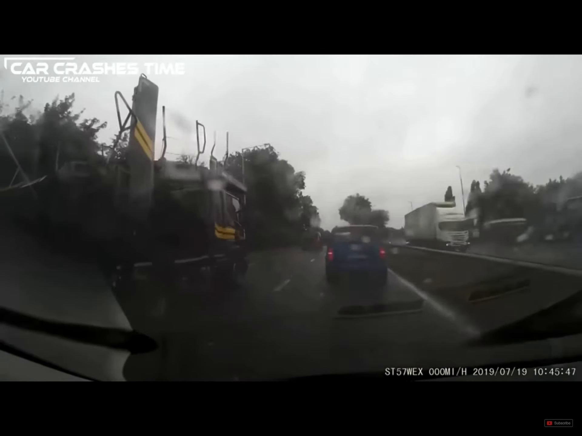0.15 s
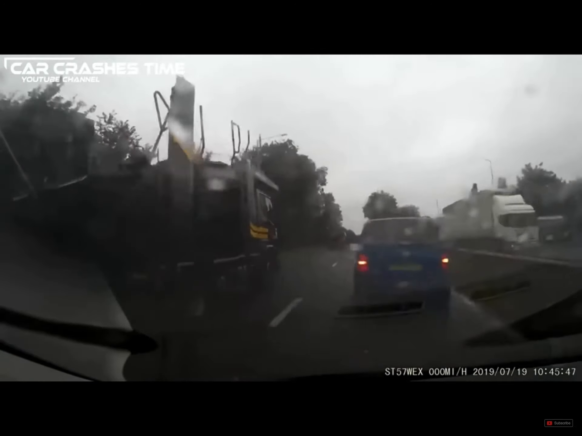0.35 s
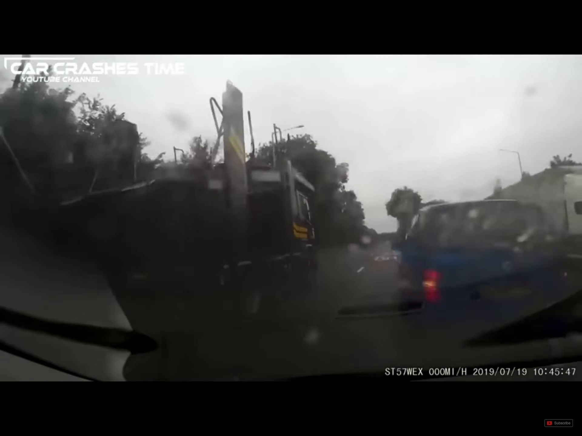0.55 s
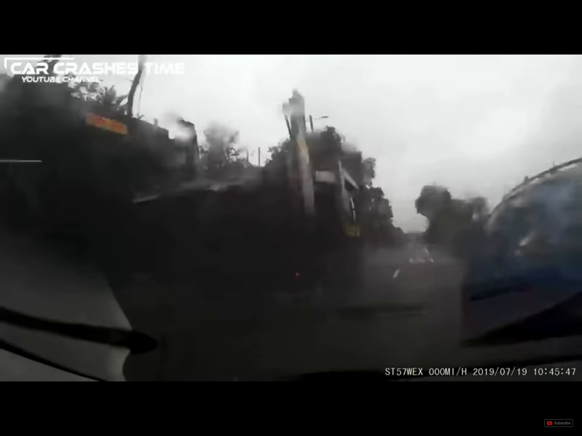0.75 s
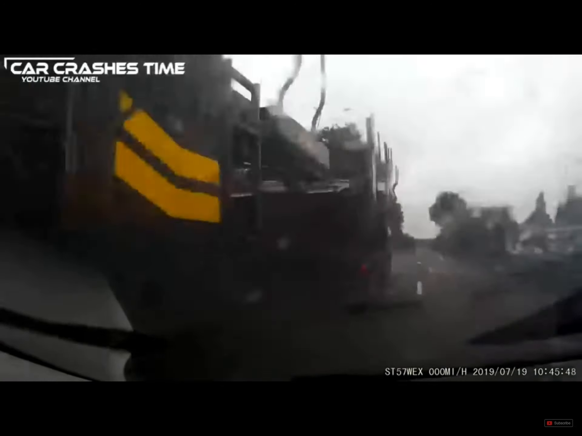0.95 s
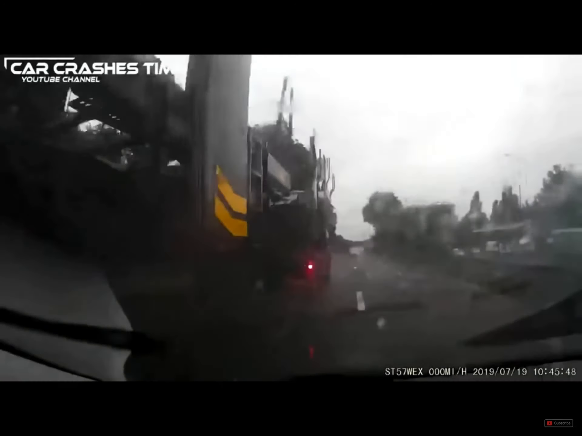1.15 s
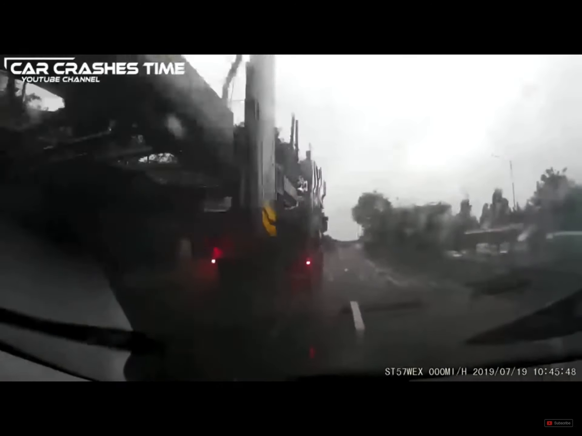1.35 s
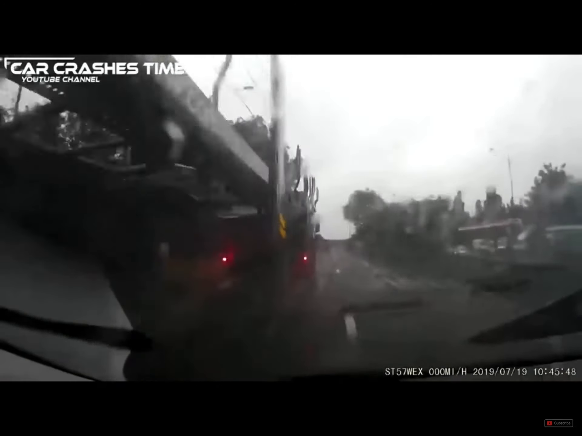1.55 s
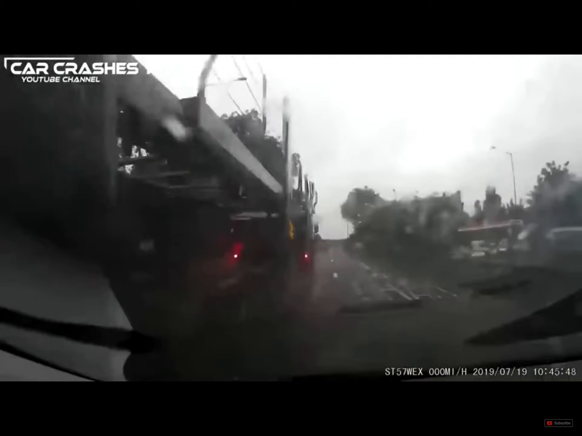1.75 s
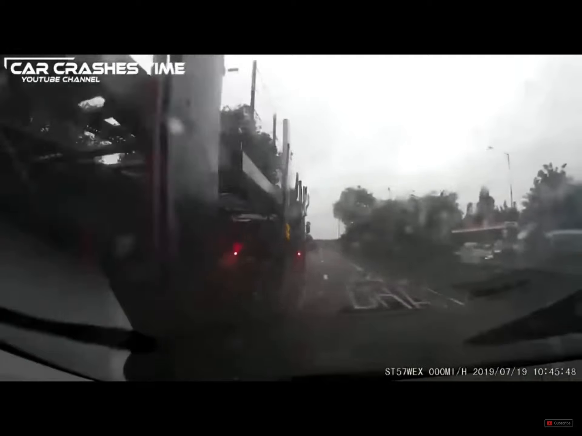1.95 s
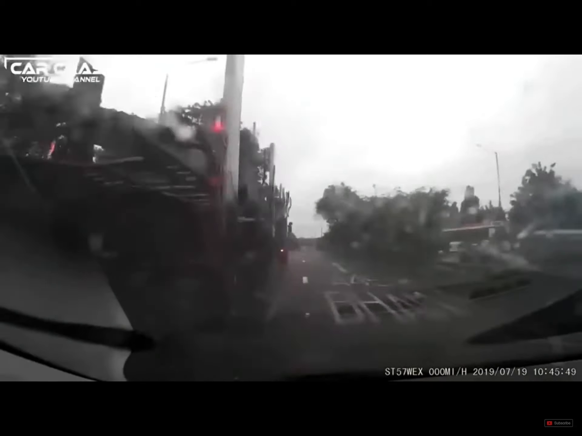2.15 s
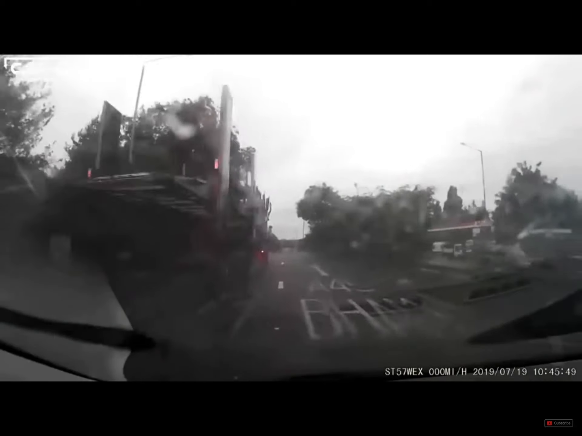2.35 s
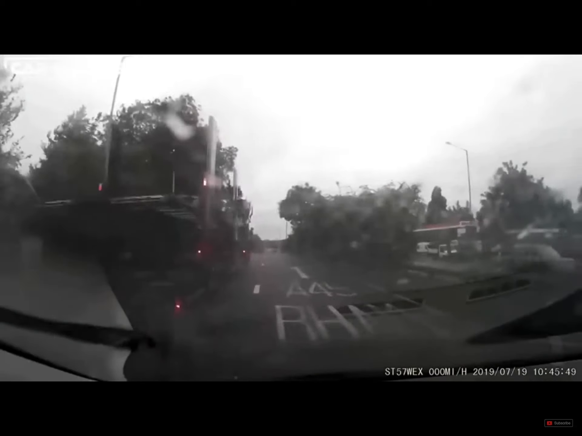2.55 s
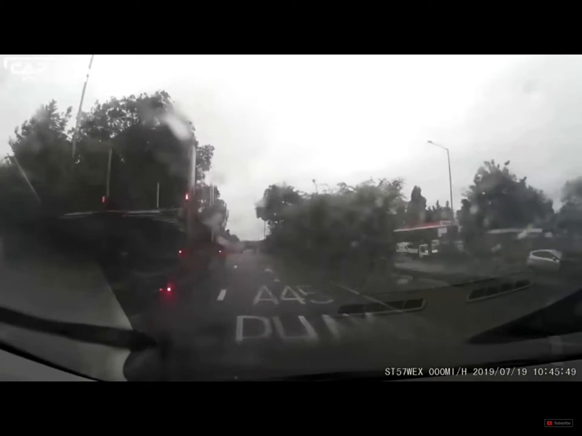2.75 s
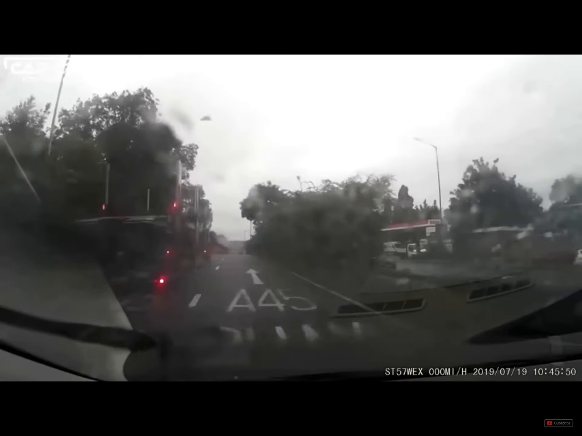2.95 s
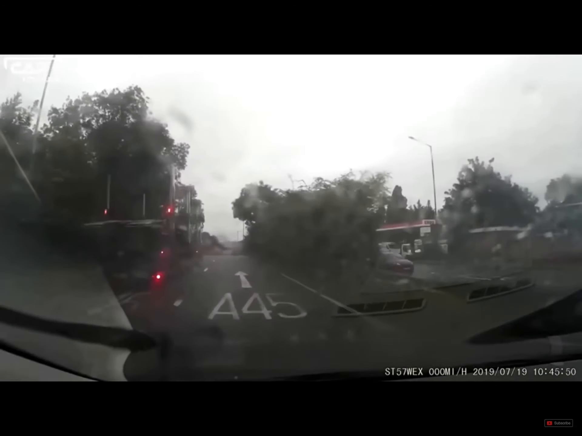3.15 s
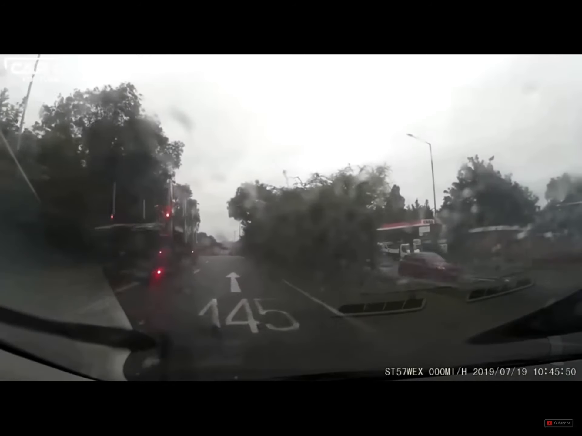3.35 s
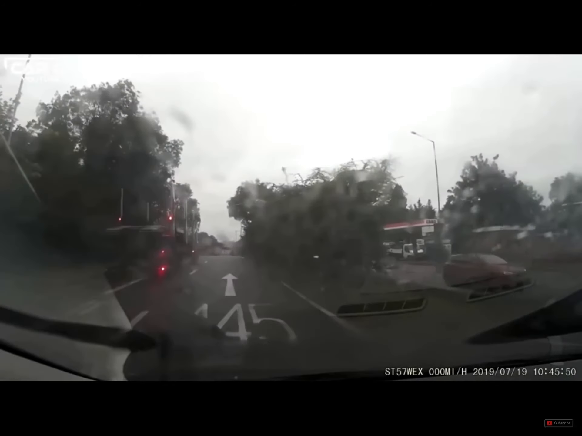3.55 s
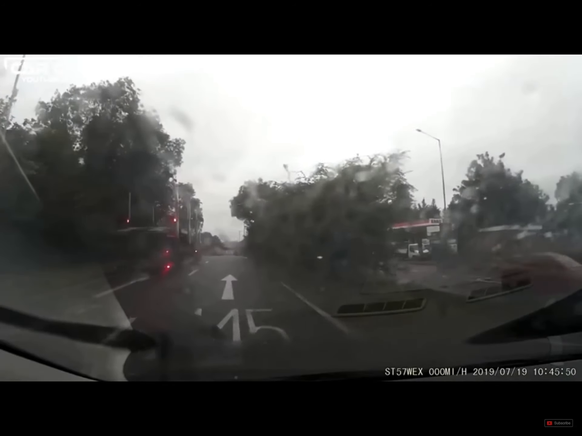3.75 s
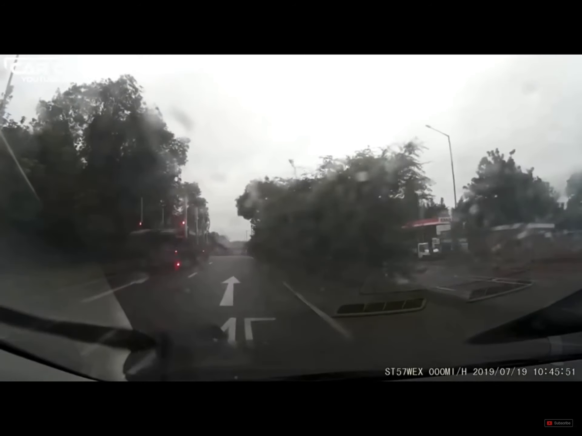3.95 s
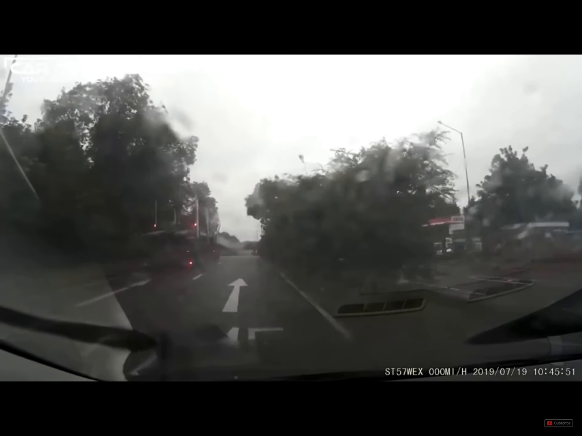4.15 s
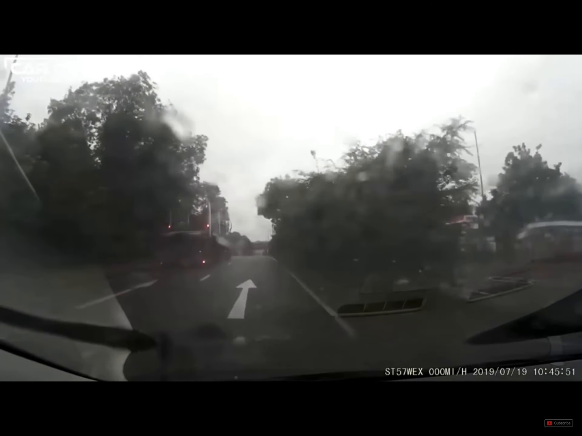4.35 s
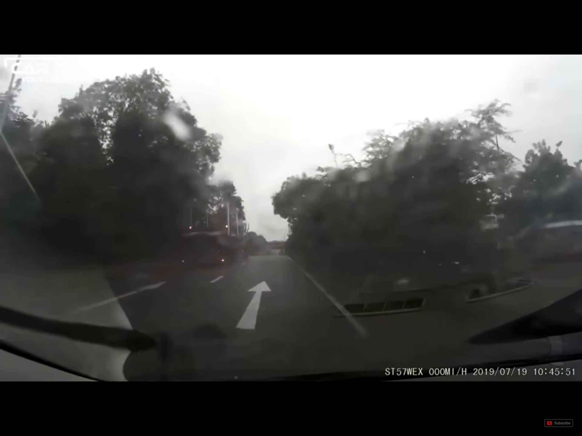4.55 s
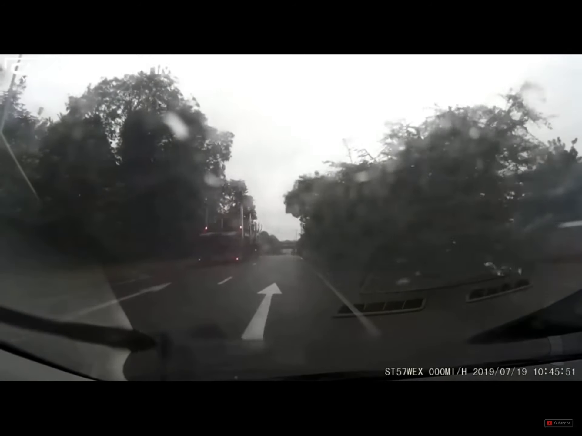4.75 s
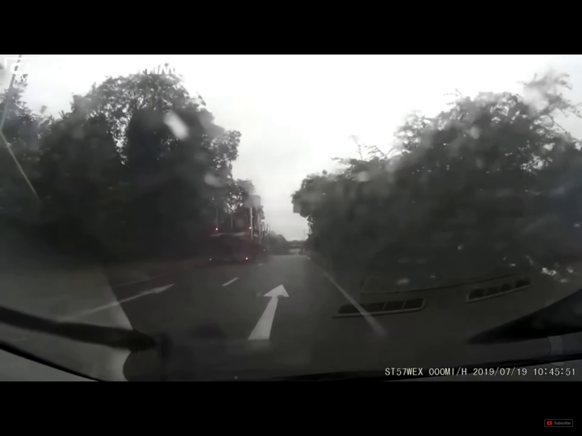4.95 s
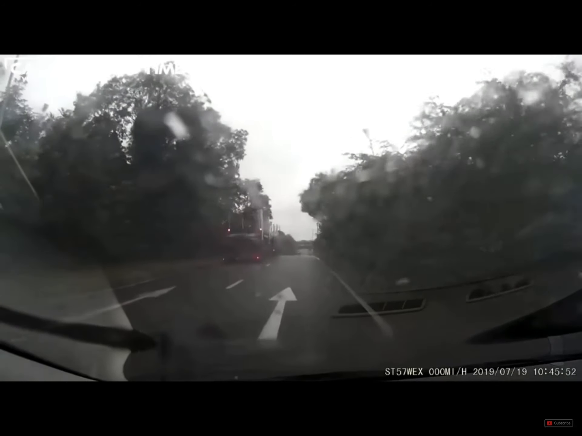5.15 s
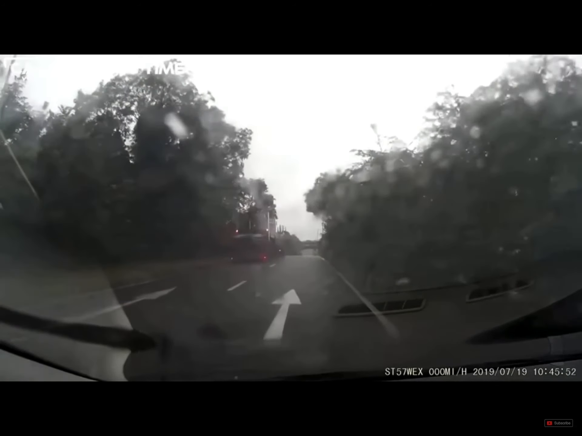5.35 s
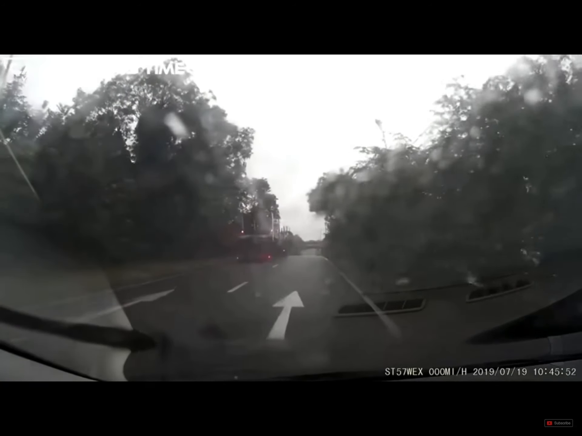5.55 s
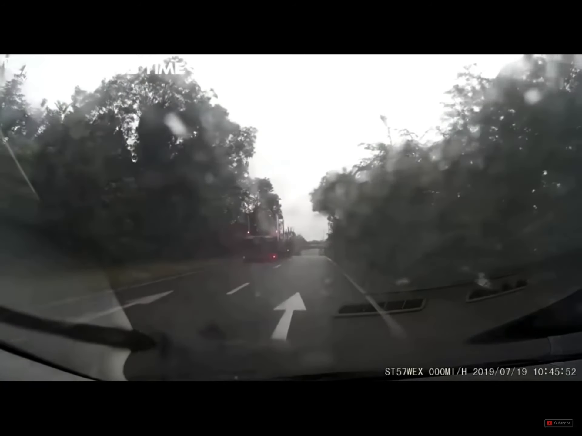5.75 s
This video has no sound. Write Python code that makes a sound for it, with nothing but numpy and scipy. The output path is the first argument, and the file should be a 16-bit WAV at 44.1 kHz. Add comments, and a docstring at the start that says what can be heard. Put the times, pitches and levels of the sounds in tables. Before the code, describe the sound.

Inside a closed car on a rainy road, sharp knocks and a high chirping rattle come first. Heavy, distorted thuds, booms, grinding and cracking trim burst out as the car is struck and scraped. After about two seconds the blows thin into smaller clatter with brief metallic notes, then faint rumble and wet hiss as it slows. A small windscreen microphone overloads.

```python
"""Inside a car braking hard on a wet road, a hard thud and a door boom open the scene; a loose part chirps and
knocks sound; heavier thuds and booms follow from 0.7 s. The car is struck and scraped along its side, jolts on
and rolls to a crawl. Noise drives the resonances of springs, shell, door and panels; coloured clicks grind,
rasp and crack; short tones ring out of the clatter; taps excite the loose part; filtered clicks make the tyres
hiss in the water. The small microphone on the windscreen overloads on the hardest blows."""
import sys
import numpy as np
from scipy import signal
from scipy.fft import rfft, irfft
from scipy.io import wavfile

SR = 44100
rng = np.random.default_rng(int(sys.argv[2]) if len(sys.argv) > 2 else 0)


def output_pcm(signal):
    """Save a mono or channel-first signal as 16-bit PCM at the path in sys.argv[1].

    Samples are clipped to [-1, 1] before scaling.
    """
    pcm = np.clip(np.atleast_2d(signal).T, -1, 1) * 32767
    wavfile.write(sys.argv[1], SR, np.round(pcm).astype(np.int16))


N = 259749   # length in samples

# All levels are relative mixing levels.
# Shaking of the car: start_s, suspension_db, boom_db, grind_db, rasp_db (above the grinding)
SHAKING_CURVES = [(0.0, -9, -15.5, -30.5, -2), (0.15, -14, -17, -35, -8.5), (0.35, -16.5, -13, -28.5, -9),
                  (0.63, -19.5, -13, -24.5, -16), (0.69, -32, -7.5, -19.5, -12.5), (0.78, -1, 3.5, -3, -12),
                  (0.92, -9.5, -16, -27, -31), (1.02, -6, 0.5, -5, -8), (1.12, -1, -10, -25, -13.5),
                  (1.18, 4, -6, -21.5, -1), (1.23, -9, -13, -22.5, -12), (1.33, -5.5, -16.5, -17, -19),
                  (1.48, -11, 5.5, -1.5, -14), (1.7, -5, -20, -21.5, -14.5), (1.79, -11.5, -17, -19, -16.5),
                  (1.87, -9, -9.5, -16.5, -17.5), (2.1, -12, -19.5, -30, -18),
                  (2.45, -19.5, -21, -21.5, -18.5), (2.66, -20.5, -27.5, -29, -15), (2.9, -19, -30, -33, 0),
                  (3.1, -18.5, -25.5, -32, -11), (3.5, -32.5, -32.5, -39.5, -5),
                  (3.9, -35, -34.5, -50, 2.5), (4.3, -29, -33, -46, -4.5), (4.7, -37.5, -39, -45.5, -5),
                  (5.2, -32.5, -35, -38, -9.5), (5.6, -37, -40, -43.5, -9.5), (5.89, -35.5, -43, -41.5, -5)]
# Blows on the car: start_s, door_db, crack_db and thump_db (above the door), contact_s
BLOW_EVENTS = [(0.036, 0.5, -5, 0.5, 0.0083), (0.063, -5.5, -1, -15, 0.0065),
               (0.151, -16.5, -11.5, -8, 0.0068), (0.239, -3.5, -11.5, -4, .01),
               (0.315, -32.5, 11, 3, .015), (0.334, -27.5, 8.5, -8, 0.025), (0.353, -19.5, 0, -7, 0.019),
               (0.488, -25, 5.5, -4, 0.017), (0.514, -24, -19, 17.5, 0.0058),
               (0.708, 2, -12.5, 12.5, 0.013), (0.733, 3.5, -12, -6, 0.028), (0.79, -8, -3.5, 5, 0.033),
               (0.832, -10, -3.5, 0, 0.024), (0.87, 8.5, -6.5, -19, 0.0078), (0.977, 1, -12.5, 7.5, 0.034),
               (1.009, -4.5, 2, 11, 0.0043), (1.036, -9.5, 0, 10.5, 0.015), (1.079, -17, -0.5, -1, 0.025),
               (1.163, 4, -17.5, 6, 0.0021), (1.178, -10.5, 0, -13, 0.011), (1.246, -19, -1, 18, 0.01),
               (1.334, -8, -22, -13, 0.03), (1.365, 0, -22, 2, 0.027), (1.399, -14.5, 2, 20.5, 0.031),
               (1.442, 0, -8.5, -16, .024), (1.469, 15.5, -17, -11, 0.041), (1.52, 4.5, -12, 3.5, 0.031),
               (1.617, -0.5, -18, -8, .006), (1.676, -17, -2, 13.5, 0.0061), (1.749, -27, -11, 17, 0.019),
               (1.842, -7.5, -9.5, 4.5, 0.037), (1.867, -17, 0.5, -5, 0.027),
               (1.892, -3.5, -20, -10, 0.014), (1.948, -21, -12, -3, .008), (2.039, -29, -20, -5, .01),
               (2.349, -15.5, -13, 3, .005), (2.399, -8, -26, -4, 0.017), (2.427, -13, -12.5, 7, 0.0074),
               (2.487, -14, -40, -19, 0.02), (2.535, -11, -35, -20, .024), (2.57, -5, -20, -14, 0.0029),
               (2.685, -14.5, -12, -16, 0.0054), (2.763, -12.5, -25, -3, 0.035),
               (2.796, -8, -16, -22, 0.017), (2.827, -15, -13.5, 4.5, 0.028),
               (2.863, -14.5, -12, -13, 0.026), (2.949, -20.5, -7, -6, 0.013), (2.999, -22, -8, -15, 0.03),
               (3.053, -19, -36, 12.5, 0.0082), (3.095, -17.5, -5, 0, .022), (3.123, -15.5, -16, -1, 0.016),
               (3.176, -27.5, 2, 7, 0.0066), (3.256, -10.5, -41, -13, 0.016), (3.297, -14.5, -24, -3, .008),
               (3.367, -23.5, -2, -9, 0.005), (3.449, -39.5, 10, 1, .01), (4.182, -9.5, -26, -4, .015),
               (4.774, -47, 10, 3, .006), (4.949, -13, -28, 2.5, 0.0095), (4.973, -13.5, -32, -3, 0.012),
               (4.986, -8.5, -39, -8, 0.0033)]
# Lurches of the car on its springs: peak_s, level_db
LURCH_EVENTS = [(0.07, -23), (0.46, -10), (0.884, 23.5), (1.06, 13), (1.129, -6), (1.299, 3), (1.519, 15),
                (2.02, -14), (2.14, -2.5), (2.281, 2), (2.68, -16), (3.079, -16), (3.4, -20), (4.28, -29),
                (4.71, -23), (5.2, -32)]
# Single notes that ring out of the clatter: start_s, level_db, pitch_hz
RINGING_NOTES = [(.037, -5, 710), (0.045, -20, 1480), (.064, -13, 790), (.239, -12, 858),
                 (0.238, -14.5, 1286), (2.04, -30.5, 2110), (2.186, -25, 2790), (2.797, -22, 905),
                 (2.81, -36, 2800), (2.83, -20.5, 1510), (2.852, -17.5, 1640), (2.874, -20.5, 1474),
                 (2.92, -33, 3480), (2.937, -30, 2330), (2.945, -27.5, 1690), (2.953, -23, 2840),
                 (3.056, -17, 380), (3.121, -25.5, 3060), (3.432, -29, 800), (4.184, -27.5, 2860),
                 (4.186, -30, 1294)]
# Strongest taps of the loose part: start_s, level_db
STRONG_TAPS = [(0.417, -29), (0.4462, -23), (0.5267, -26), (0.67, -25), (0.9238, -23), (0.9337, -19),
               (1.2281, -25), (1.5934, -17), (1.659, -29), (1.734, -29), (1.7488, -30), (1.7757, -33),
               (1.7794, -25), (1.9485, -32), (1.9668, -31), (1.996, -30)]
# Its weaker taps, as a curve: start_s, level_db
WEAK_TAPS_CURVE = [(0, -36), (.6, -38.5), (1.2, -29), (1.6, -23.5), (2.0, -30.5), (2.08, -51), (2.2, -91)]

# Resonances of the door: pitch_hz, width_hz, level_db
DOOR_MODES = [(298, 39, 0.5), (390, 113, 1), (567, 49, 8), (699, 170, 2), (767, 89, 6), (962, 163, -7.5)]
# Resonances of the small panels: pitch_hz, width_hz, level_db
PANEL_MODES = [(1132, 235, 2.5), (1344, 550, 3.5), (1555, 330, -2), (1670, 150, -26)]
# Resonances of the body shell: pitch_hz, width_hz, level_db
SHELL_MODES = [(46.3, 30, -10), (104.3, 20.9, 1.5), (133.6, 17.7, 1.5), (192, 63, -8)]
# Wheel-hop resonance of the axle: pitch_hz, width_hz, level_db
AXLE_MODES = [(33.55, 9.2, 0)]
# Resonances of the loose part: pitch_hz, width_hz, level_db
LOOSE_PART_MODES = [(4120, 300, 0), (4400, 350, -3)]

# Spectrum of the cracking trim: pitch_hz, level_db (per Hz)
CRACK_SPECTRUM = [(880, -25.5), (1500, -1.5), (1940, -17.5), (2540, -8), (3860, -10.5), (4620, -12.5),
                  (5050, -18), (5450, -17), (5910, -39), (9000, -49.5), (11700, -49), (19800, -120)]
# Spectrum of the high treble in hard cracks: pitch_hz, level_db (per Hz)
SNAP_SPECTRUM = [(3500, -41), (5500, 10), (7000, 3), (11000, -2), (14500, -7.5), (16500, -28)]
# Spectrum of the swaying suspension: pitch_hz, level_db (per Hz)
SUSPENSION_SPECTRUM = [(7.1, -9.5), (12, -13.5), (32, -1), (70, -4), (90, -12), (120, -42), (200, -120)]
# Spectrum of the grinding: pitch_hz, level_db (per Hz)
GRIND_SPECTRUM = [(120, -26.5), (200, 0), (435, 0), (497, -7), (567, -5.5), (628, -9.5), (975, -11),
                  (1760, -22), (2300, -26), (2990, -60), (5060, -120)]
# Spectrum of the rasp above the grinding: pitch_hz, level_db (per Hz)
RASP_SPECTRUM = [(1060, -24), (1800, -12), (2140, -7), (2850, 4.5), (3650, -3), (4210, -12), (5320, -16),
                 (6560, -31), (9000, -29.5), (11700, -38.5), (19800, -120)]
# Spectrum of the wet road inside the cabin: pitch_hz, level_db (per Hz)
WET_ROAD_SPECTRUM = [(120, -32), (200, -39), (222, -5), (243, -34.5), (322, -31), (352, -22), (391, -1.5),
                     (518, -15), (576, -3), (1470, -8.5), (1880, -24), (3070, -19), (6790, -45),
                     (13500, -45)]

BLOW_T60_S = 0.078   # decay of the door; the other parts take multiples of it
PANEL_DB, PANEL_FOLLOWS = -13, 0.17   # panels against the door; share of crack_db that they follow
LURCH_RISE_S, LURCH_T60_S = 0.023, 0.05   # the last 20 dB of the rise; 60 dB of decay
PING_T60_S, PING_T60_SLOPE = 0.091, -0.096   # at 1 kHz; higher notes die sooner, as pitch to this power
WET_ROAD_DB, WET_SWING_DB = -39.5, 1.5
OVERLOAD, CUTOFF_HZ = .87, 15650   # microphone input: clipping level as amplitude, top of its band


def blows():
    """Each blow booms in the door, crunches in small panels, cracks in the trim and thumps in the shell."""
    s, door_db, crack_db, thump_db, hold_s = np.transpose(BLOW_EVENTS)
    panel_db = door_db + PANEL_DB + PANEL_FOLLOWS * crack_db
    t60_s = np.full(len(s), BLOW_T60_S)

    door_force = grit(2000, 2.73) * contact(s, door_db - 9.5, hold_s, t60_s)
    door = resonate(door_force + strikes(s, door_db + 11), DOOR_MODES)

    panel_force = grit(2500, 5.8) * contact(s, panel_db + 2.0, hold_s, 1.9 * t60_s)
    panel = resonate(panel_force + strikes(s, panel_db + 15.5), PANEL_MODES)

    fits = from_db(1.8 * drift(120))   # the trim gives way in fits
    crack_force = contact(s, door_db + crack_db - 9.0, hold_s, 1.15 * t60_s)
    crack = colour(grit(9000, 0.66) * fits * crack_force, CRACK_SPECTRUM)

    # the harder the crack, the larger its share of high treble
    snap_force = contact(s, 1.78 * (door_db + crack_db) - 18.5, hold_s, 1.1 * t60_s)
    snap = colour(rng.standard_normal(N) * snap_force, SNAP_SPECTRUM)

    thump_force = contact(s, door_db + thump_db - 8.5, hold_s, 2.33 * t60_s)
    thump = resonate(rng.standard_normal(N) * thump_force, SHELL_MODES[1:])   # without the lowest mode
    return dull(door, 1600) + dull(panel, 2600) + crack + snap + dull(thump, 540)


def contact(s, db, hold_s, t60_s):
    """Force envelopes of all blows: a first jolt, a hold and a decay; they add as powers."""
    power = np.zeros(N)
    for start, level_db, hold, fall in zip(s, db, hold_s, t60_s):
        i = round(start * SR)
        t = np.arange(min(N - i, SR)) / SR
        fading_db = -60 * np.maximum(t - abs(hold), 0) / max(fall, .005)
        jolt_db = 5.1 * np.exp(-t / 0.00066)
        rise = np.minimum(t / (0.00064 + 0.077 * abs(hold)), 1)   # longer contacts start softer
        power[i:i + len(t)] += (from_db(level_db + fading_db + jolt_db) * rise) ** 2
    return np.sqrt(power)


def strikes(s, db):
    """The first touch of each blow or tap is one single click."""
    clicks = np.zeros(N)
    clicks[np.round(s * SR).astype(int)] = from_db(db)
    return clicks


def shaking():
    """Road and impact shake the springs and the shell; sliding tyres and metal grind and rasp, in lumps."""
    suspension_db, boom_db, grind_db, rasp_db = in_time(SHAKING_CURVES)

    axle = dull(resonate(rng.standard_normal(N), AXLE_MODES), 110)
    sway = colour(rng.standard_normal(N), SUSPENSION_SPECTRUM) + 1.14 * axle
    hop_hz = AXLE_MODES[0][0] * from_db(1.5 * drift(8.02))
    hop = np.sin(2 * np.pi * np.cumsum(hop_hz) / SR)
    # a lurch sets the wheels hopping
    lurches = np.sqrt(lurching()) * (.5 * sway + 1.14 * hop)
    suspension = 0.67 * from_db(suspension_db) * sway + lurches
    suspension = .75 * np.tanh(suspension / .75)   # the bump stops limit the travel

    shell = dull(resonate(rng.standard_normal(N), SHELL_MODES), 1100)
    boom = from_db(boom_db + 3.1 * drift(9.7)) * shell

    lumps_db = np.clip(0.66 * (grind_db + 41.0), .5, 3.0)   # gentle rolling is smooth, hard sliding lumpy
    grind_gain = from_db(grind_db + .55 * lumps_db * drift(25))
    grind = grind_gain * colour(grit(5000, 3.5), GRIND_SPECTRUM)
    rasp_gain = from_db(grind_db + rasp_db + lumps_db * drift(13.7))
    rasp = rasp_gain * colour(grit(12000, 3.1), RASP_SPECTRUM)
    return suspension + boom + grind + rasp


def lurching():
    """Power of the lurches on the springs: each swells to its peak and dies away; they add as powers."""
    t, power = np.arange(N) / SR, 0
    for s, db in LURCH_EVENTS:
        slope_db = np.where(t < s, 20 / LURCH_RISE_S, -60 / LURCH_T60_S)   # dB per second
        power = power + from_db(2 * (db + slope_db * (t - s)))
    return power


def notes():
    """Short single tones, roughened by the scraping that sets them off."""
    out, t = np.zeros(N + SR), np.arange(SR // 5) / SR
    for s, db, hz in RINGING_NOTES:
        i = round(s * SR)
        t60_s = PING_T60_S * (hz / 1e3) ** PING_T60_SLOPE
        envelope = from_db(db - 60 * t / t60_s) * np.minimum(t / 0.002, 1)
        out[i:i + len(t)] += envelope * np.sin(2 * np.pi * hz * t)
    return out[:N] * (1 + .7 * drift(250))


def loose_part():
    """A small hard part chatters in its seat, about a hundred uneven taps a second."""
    chatter_db, = in_time(WEAK_TAPS_CURVE)
    turns = np.cumsum(100.0 * from_db(2.9 * drift(40))) / SR
    ticks = np.diff(np.floor(turns), prepend=0)   # one tap at each full turn
    taps = ticks * from_db(chatter_db + 2.3 * rng.standard_normal(N))
    taps += strikes(*np.transpose(STRONG_TAPS))
    # each tap scrapes for about 6 ms
    scrapes = signal.fftconvolve(taps, np.hanning(SR // 170))[:N] * rng.standard_normal(N)
    band = signal.butter(2, [3750, 4800], "band", fs=SR, output="sos")
    return from_db(-3.5) * signal.sosfilt(band, resonate(scrapes, LOOSE_PART_MODES))


def wet_road():
    """Spray from the tyres and rain on the roof, dense clicks heard through the closed cabin."""
    gain = from_db(WET_ROAD_DB + WET_SWING_DB * drift(2.8))
    return gain * colour(grit(9000, 3.2), WET_ROAD_SPECTRUM)


def grit(per_s, spread_db):
    """Dense clicks of uneven size and random sign, rms 1."""
    sizes = from_db(spread_db * np.minimum(rng.exponential(1, N), 4))
    signed = sizes * rng.choice([-1, 1], N)
    return rms_one(signed * (rng.random(N) < per_s / SR))


def resonate(x, modes):
    """Parallel resonances with alternating signs; white noise keeps about its rms."""
    out, power = 0, 0
    for k, (hz, width_hz, db) in enumerate(modes):
        r = np.exp(-np.pi * width_hz / SR)   # pole radius
        poles = [1, -2 * r * np.cos(2 * np.pi * hz / SR), r * r]
        one = signal.lfilter([1, 0, -1], poles, x + 1e-18)
        out = out + (-1) ** k * from_db(db) * (1 - r * r) / 2 * one
        power += from_db(2 * db) * np.pi * width_hz / SR
    return out / np.sqrt(power)


def colour(x, spectrum, size=16384):
    """Causal (minimum-phase) filter with the given spectrum; white noise keeps its rms."""
    hz, db = np.transpose(spectrum)
    grid_hz = np.maximum(np.arange(size // 2 + 1) * SR / size, 1)
    log_gain = np.interp(np.log(grid_hz), np.log(hz), db) * np.log(10) / 20
    # folding the cepstrum onto positive times makes the phase minimal
    cepstrum = irfft(log_gain)
    cepstrum[1:size // 2] *= 2
    cepstrum[size // 2 + 1:] = 0
    response = irfft(np.exp(rfft(cepstrum)))
    return signal.fftconvolve(x, response / np.sqrt(np.sum(response ** 2)))[:N]


def dull(x, cut_hz):
    """A gentle low-pass: the treble above the modes falls away."""
    return signal.sosfilt(signal.butter(2, cut_hz, fs=SR, output="sos"), x)


def drift(rate_hz):
    """Slow random wandering with rms 1: noise low-passed at the rate."""
    r = np.exp(-2 * np.pi * rate_hz / SR)
    noise = rng.standard_normal(N + SR)
    return rms_one(signal.lfilter([1], [1, -2 * r, r * r], noise)[SR:])   # skip the filter's first second


def in_time(rows):
    """Columns of a curve table, one value a sample."""
    s, *columns = np.transpose(rows)
    return [np.interp(np.arange(N) / SR, s, c) for c in columns]


def rms_one(x):
    """Scale to unit rms."""
    return x / np.sqrt(np.mean(x ** 2) + 1e-20)


def from_db(db):
    """Decibels to gain."""
    return 10 ** (np.asarray(db) / 20)


def scene():
    """All sources at the one microphone on the windscreen."""
    return (shaking() + blows() + loose_part() + notes() + wet_road())[None]


def record(dry):
    """The microphone input clips hard; a small compressed share of the excess is added back; the top is cut."""
    x = dry / OVERLOAD
    clipped = x / (1 + np.abs(x) ** 8.0) ** (1 / 8.0)
    limited = OVERLOAD * (clipped + .097 * np.arcsinh(x - clipped))
    top_cut = signal.ellip(12, .5, 80, CUTOFF_HZ, fs=SR, output="sos")
    return signal.sosfilt(top_cut, limited)


dry = scene()
out = record(dry)
output_pcm(out)
```